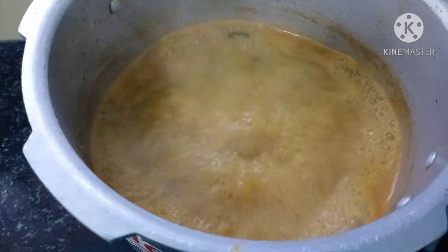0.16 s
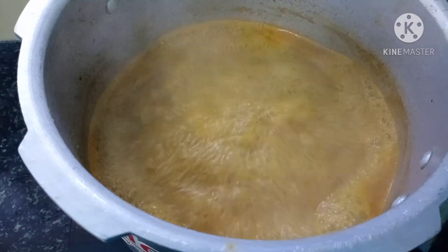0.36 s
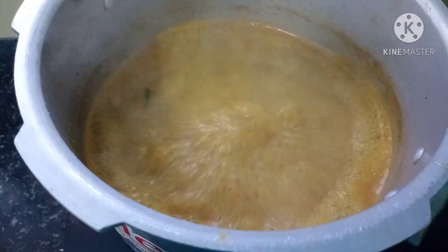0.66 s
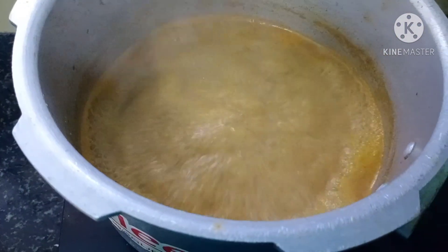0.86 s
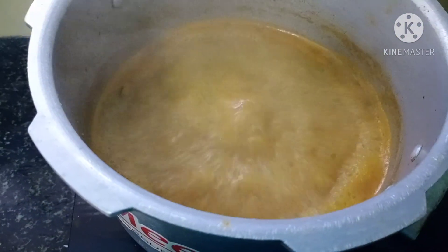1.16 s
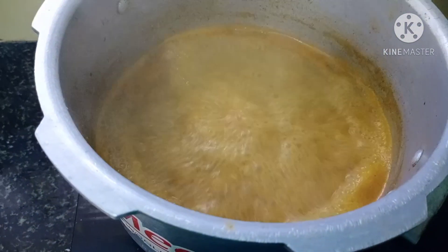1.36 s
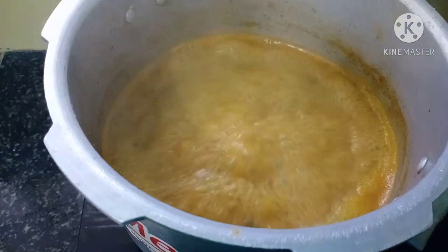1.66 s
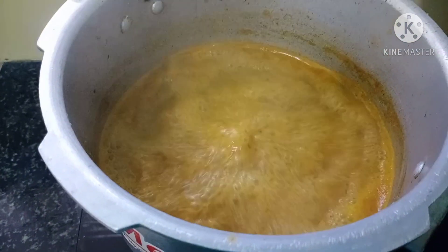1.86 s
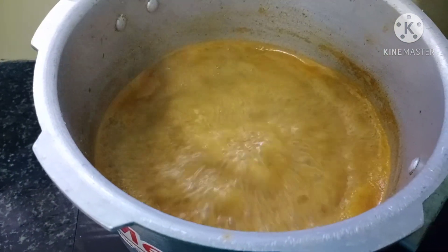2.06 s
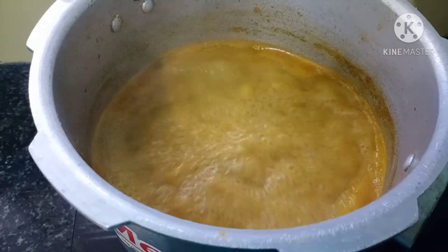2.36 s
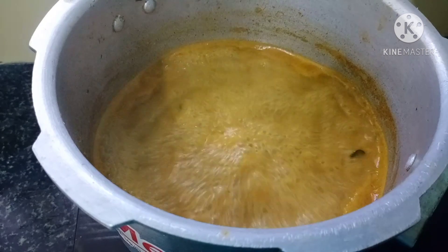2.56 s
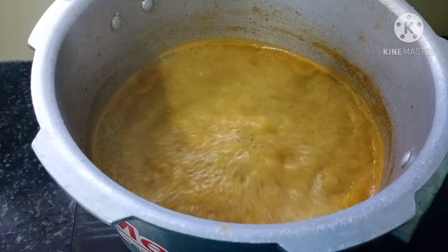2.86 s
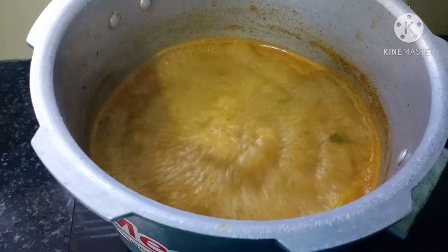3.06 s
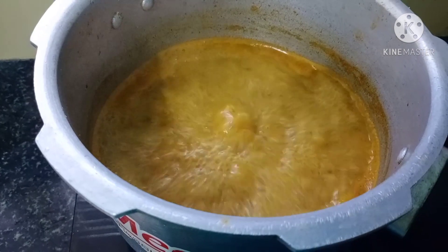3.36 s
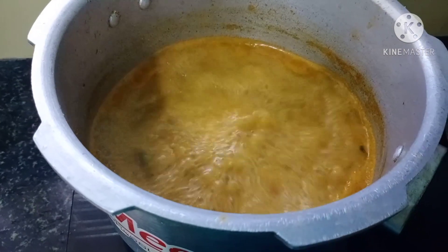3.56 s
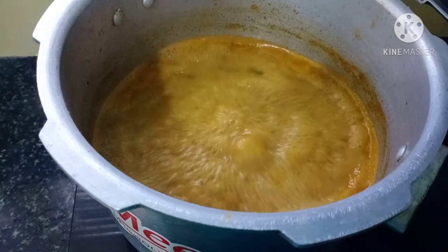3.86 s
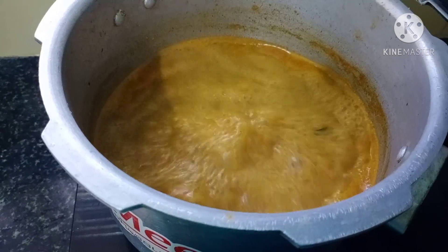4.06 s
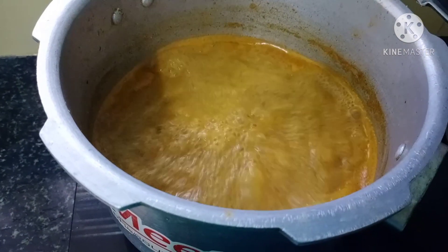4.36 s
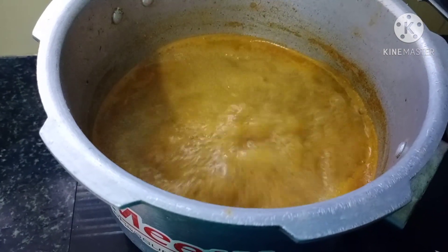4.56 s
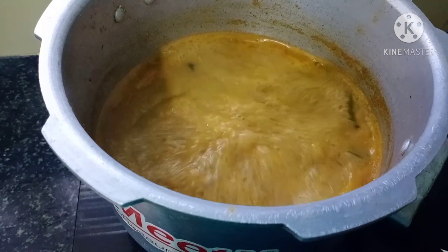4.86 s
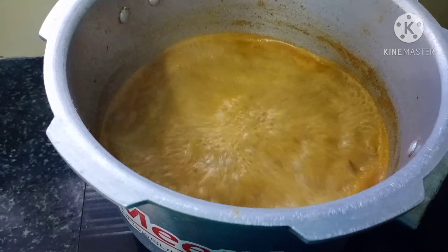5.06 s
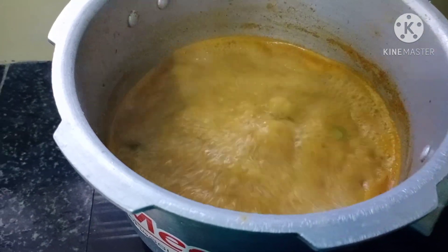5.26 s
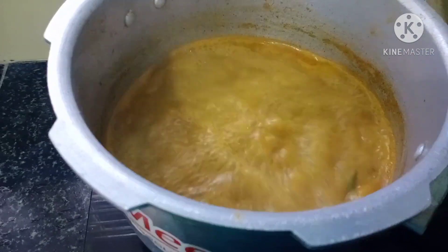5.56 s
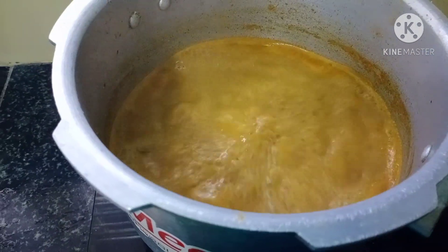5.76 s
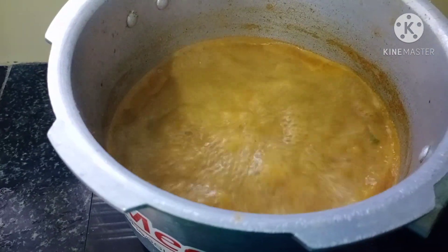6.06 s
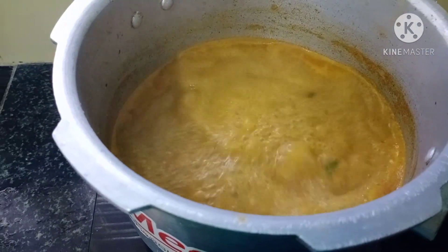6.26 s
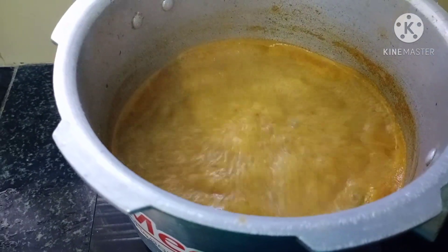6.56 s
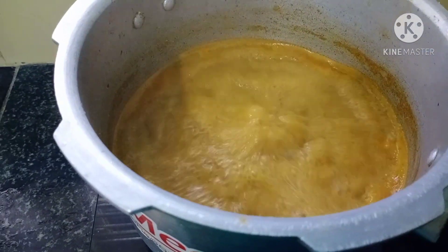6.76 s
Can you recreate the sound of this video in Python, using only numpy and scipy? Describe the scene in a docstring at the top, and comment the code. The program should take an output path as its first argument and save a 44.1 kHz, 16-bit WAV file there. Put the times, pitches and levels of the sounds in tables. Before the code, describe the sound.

Thick curry boils in an open metal cooker for about seven seconds, heard close, from just above the rim. The main sound throughout is dense bubbling that rings the base with a fluttering, mid-pitched metallic tone. It surges around 0.4, 1.6, 2.1 and 3.4 seconds and is strongest near 6.2. Below it, bursting bubbles make hollow gurgles and soft, throbbing booms, clearest near 2.1 seconds, with a few small glugs and gentle lapping. A low churning rumble heaves at about 0.6, 1.1 and 6.3 seconds. Froth pops and fizzes quietly on top, growing a little from 6 seconds. Tiny sharp spits come at about 2.2 and 3.6 seconds, then more often from 5.4 to the end. Behind everything, the gas burner gives a faint, thin hiss and holds one faint, steady tone.

```python
"""Vapour bubbles collapse on the hot base of an open metal cooker of boiling curry, ringing it near 1.2 kHz.
The heaving liquid rumbles and laps at the wall; bursting domes gurgle and boom in the pot's air.
Froth pops, fizzes and spits on top. The gas burner hisses and holds one faint tone.
Heard from just above the rim."""
import sys
import numpy as np
from scipy import signal
from scipy.fft import rfft, irfft, next_fast_len
from scipy.io import wavfile
from scipy.ndimage import uniform_filter1d

SR = 44100
rng = np.random.default_rng(int(sys.argv[2]) if len(sys.argv) > 2 else 0)


def master(y):
    """Save y as 16-bit WAV."""
    cut = np.clip(np.atleast_2d(y).T, -1, 1)
    pcm = np.round(cut * 32767)  # scale
    wavfile.write(sys.argv[1], SR, pcm.astype(np.int16))


N = 304092
TIME = np.arange(N) / SR
FFT_SIZE = next_fast_len(N, real=True)
BIN_HZ = np.arange(FFT_SIZE // 2 + 1) * SR / FFT_SIZE
HEAVE_REST_DB = -56

# foam activity: time_s, froth_db, fizz_db
FOAM_LEVELS = [(0, -53, -53), (0.5, -52, -53), (0.9, -53, -53.5), (3.5, -53, -53), (4.75, -54, -55),
               (5.25, -52, -54), (5.7, -52.5, -52.5), (5.95, -50.5, -53), (6.35, -48, -51.5),
               (6.55, -51.5, -50), (6.9, -49.5, -51.5)]
# vapour pockets lifting the liquid: start_s, length_s, level_db
HEAVES = [(0.2, 0.11, -53), (0.599, 0.074, -39), (0.724, 0.2, -46), (1.119, 0.1, -40), (1.87, 0.17, -50),
          (2.045, 0.19, -45), (2.762, 0.23, -52.5), (3.116, 0.079, -51), (3.466, 0.079, -53),
          (3.634, 0.16, -44.5), (5.59, 0.4, -53), (6.338, 0.11, -41), (6.768, 0.077, -46.5)]
# loudest brief swells of the 1.2 kHz ring: centre_s, level_db
RING_SWELLS = [(0.3108, -21.5), (0.343, -20), (0.395, -23), (0.473, -17.5), (0.4862, -18), (0.5138, -20),
               (1.0154, -23.5), (1.055, -21.5), (1.488, -24.5), (1.594, -22.5), (1.664, -24),
               (1.725, -19.5), (1.7652, -22.5), (1.8148, -24), (1.8761, -24.5), (2.0615, -23),
               (2.0989, -19), (2.12, -19.5), (2.518, -23.5), (2.5568, -22), (2.5972, -23.5),
               (2.6202, -21.5), (2.9759, -24), (3.0004, -28), (3.0178, -19.5), (3.1628, -19.5),
               (3.3743, -16), (3.3867, -16.5), (3.425, -21.5), (3.4828, -25), (3.512, -21), (3.5943, -16.5),
               (3.6205, -22), (3.6827, -21), (3.714, -24.5), (3.804, -23), (3.896, -19), (3.922, -20),
               (4.0443, -19.5), (4.3464, -23.5), (4.371, -22), (4.6122, -20), (4.7028, -21), (4.9028, -21),
               (4.9929, -21.5), (5.0836, -20), (5.113, -23), (5.146, -25.5), (5.1696, -24), (5.465, -23.5),
               (5.5803, -25), (5.7954, -23), (6.009, -17.5), (6.1068, -21), (6.163, -28), (6.1996, -14.5),
               (6.2273, -21), (6.255, -15.5), (6.2753, -16), (6.3, -15), (6.3185, -23), (6.5018, -18.5),
               (6.5301, -23), (6.8003, -17.5)]


def from_db(db):
    """Decibels to gain."""
    return 10 ** (np.asarray(db) / 20)


def unit_rms(x):
    """Scale to rms 1."""
    return x / np.sqrt(np.mean(x ** 2) + 1e-20)


def curves(rows):
    """Each column after time_s, interpolated per sample."""
    time_s, *columns = np.transpose(rows)
    return [np.interp(TIME, time_s, column) for column in columns]


def bin_gains(points):
    """Rows of freq_hz, gain_db to a gain per FFT bin."""
    hz, db = np.transpose(points)
    return from_db(np.interp(np.log(np.maximum(BIN_HZ, 1)), np.log(hz), db))


def filtered(x, gains):
    """Apply one gain per FFT bin."""
    return irfft(rfft(x, FFT_SIZE) * gains, FFT_SIZE)[..., :N]


def coloured(x, spectrum):
    """Impose a smooth spectrum; rms 1."""
    return unit_rms(filtered(x, bin_gains(spectrum)))


def band(x, low_hz, high_hz, order=4):
    """Butterworth band-pass."""
    return signal.sosfilt(signal.butter(order, [low_hz, high_hz], "band", fs=SR, output="sos"), x)


def resonance(x, hz, width_hz):
    """Two-pole resonator, peak gain 1."""
    r = np.exp(-np.pi * width_hz / SR)
    zeros = np.array([1, 0, -1]) * (1 - r * r) / 2
    poles = [1, -2 * r * np.cos(2 * np.pi * hz / SR), r * r]
    return signal.lfilter(zeros, poles, x + 1e-18)


def body(x, modes):
    """Parallel resonances, signs alternating."""
    return sum((-1) ** k * from_db(db) * resonance(x, hz, width_hz)
               for k, (hz, width_hz, db) in enumerate(modes))


def equalised(x, peaks):
    """Narrow peaks and notches in series."""
    for hz, width_hz, db in peaks:
        x = x + (from_db(db) - 1) * resonance(x, hz, width_hz)
    return x


def levelled(x, span_s):
    """Hold the slow level near rms 1; keep the flutter."""
    size = int(span_s * SR / 2)
    power = uniform_filter1d(uniform_filter1d(x * x, size), size)
    return x / np.sqrt(np.maximum(power, 0) + 1e-3 * np.mean(x * x))


def widened(source, side_db):
    """Stereo from two draws of a source: mid and side."""
    return source() + from_db(side_db) * source() * np.array([[1], [-1]])


def drift(cutoff_hz):
    """Slow random motion: noise through two one-pole low-passes; rms 1."""
    hop, warm_up = 40, 2000
    r = np.exp(-2 * np.pi * cutoff_hz * hop / SR)
    noise = rng.standard_normal(N // hop + warm_up + 2)
    slow = signal.lfilter([1], [1, -2 * r, r * r], noise)[warm_up:]
    return np.interp(np.arange(N) / hop, np.arange(len(slow)), unit_rms(slow))


def swells(events, rest_db, attack_s, release_s):
    """Level in dB: events rise, hold and fall over a resting level."""
    power = from_db(rest_db) ** 2 + np.zeros(N)
    for start_s, length_s, db in events:
        rise = np.clip(.5 + (TIME - start_s) / attack_s, 0, 1)
        fall = np.clip(.5 + (start_s + length_s - TIME) / release_s, 0, 1)
        power += (from_db(db) * rise * fall) ** 2
    return 10 * np.log10(power)


def pops(per_s, spread_db):
    """Random clicks, many small, few large; rms 1."""
    chance, size = rng.random((2, N))
    born, clicks = chance < per_s / SR, np.zeros(N)
    signed = 2 * size[born] - 1
    clicks[born] = np.sign(signed) * from_db(-spread_db * np.log(np.abs(signed) + .002))
    return unit_rms(clicks)


def plinks(low_hz, high_hz, decay_cycles, spread_db, count):
    """Small bubbles, each a damped sine at its own pitch; rms 1."""
    out = np.zeros(N + SR)
    for when, pitch, size in rng.random((count, 3)):
        hz = low_hz * (high_hz / low_hz) ** pitch
        t = TIME[:int(5 * decay_cycles / hz * SR)]
        height = from_db(-spread_db * np.log(max(size, .025)))
        at = int(when * N)
        out[at:at + len(t)] += height * np.exp(-hz * t / decay_cycles) * np.sin(2 * np.pi * hz * t)
    return unit_rms(out[:N])


def notes(events, swell_s, rise_per_s=0):
    """Sine notes under Gaussian envelopes, with optional glide."""
    out = np.zeros(N)
    for (centre_s, db, hz), phase in zip(events, rng.random(len(events))):
        near = np.abs(TIME - centre_s) < 3 * swell_s
        t = TIME[near] - centre_s
        cycles = hz * t * (1 + rise_per_s * t / 2) + phase
        out[near] += from_db(db) * np.exp(-(t / swell_s) ** 2) * np.sin(2 * np.pi * cycles)
    return out


def burner(tone_hz=520.4, wander_hz=0.91, waver_db=0.84, hiss_db=-0.6, flutter_db=4.0):
    """Gas hisses through the jet and sings one wavering note."""
    # jet hiss: time_s, level_db
    jet_levels = [(0, -60), (1, -57), (2.4, -60), (2.85, -54), (3.4, -57), (4.8, -59.5), (5.35, -53),
                  (6.3, -61), (6.9, -58)]
    # jet spectrum: freq_hz, gain_db
    jet_spectrum = [(8000, -30.5), (11500, -25), (13000, -14), (14500, -9.5), (15400, -12), (17000, -8.5)]
    # burner note: time_s, level_db
    tone_levels = [(0, -54.5), (1, -54), (3, -54.5), (4.5, -56), (5.6, -57), (6.9, -55.5)]
    (jet_db,), (tone_db,) = curves(jet_levels), curves(tone_levels)
    hiss = widened(lambda: coloured(rng.standard_normal(N), jet_spectrum), side_db=-4.5)
    phase = 2 * np.pi * np.cumsum(tone_hz + wander_hz * drift(3.4)) / SR
    tone = np.sqrt(2) * np.sin(phase) * from_db(tone_db + waver_db * drift(4.7))
    return from_db(jet_db + hiss_db + flutter_db * drift(70)) * hiss + tone


def wall_rings(shimmer_db=4):
    """Wall modes ring briefly and unevenly as foam washes over them."""
    # wall rings: centre_s, level_db, pitch_hz
    rings = [(6.39, -54, 2700), (6.65, -54, 2505), (6.71, -52, 3470), (6.77, -52, 3000)]
    return from_db(shimmer_db * drift(25)) * notes(rings, swell_s=0.054)


def spits(gain_db=-4, decay_s=0.0076, width_hz=1700):
    """Droplets flash to steam on the hot wall: narrow noise bursts."""
    # droplets: start_s, level_db, pitch_hz
    droplets = [(2.233, -37, 6620), (3.593, -37, 6530), (5.3872, -36, 15000), (5.745, -37, 7300),
                (5.988, -34, 6930), (6.362, -35.5, 7200), (6.4924, -29, 6600), (6.506, -33.5, 6750),
                (6.547, -38, 7050), (6.724, -33, 6900), (6.8239, -38, 7020), (6.838, -36, 6840)]
    out, t = np.zeros(N), TIME[:SR // 20]
    for start_s, db, hz in droplets:
        steam = rng.standard_normal(len(t)) * np.exp(-t / decay_s)
        burst = resonance(resonance(steam, hz, width_hz), hz, width_hz)
        at = round(start_s * SR)
        out[at:at + len(t)] += (from_db(db + gain_db) * burst / np.abs(burst).max())[:N - at]
    return out


def fizz(gain_db=-0.36, clump_db=0.5, tick_db=-7.5, spray_db=-12, burst_db=4):
    """The finest films snap in clumps: sizzle, sharper ticks, fine spray above."""
    # foam flaring on the hot wall: start_s, length_s, level_db
    flares = [(0.04, 0.068, -54), (4.52, 0.08, -57), (6.7, 0.12, -53)]
    # sizzle spectrum: freq_hz, gain_db
    spectrum = [(2500, -3.5), (5000, -32), (6000, -6), (6900, 2.5), (7600, -2.5), (8500, -9), (10000, -10),
                (12000, -17.5), (15500, 0), (17000, -9)]
    fizz_db = swells(flares, curves(FOAM_LEVELS)[1], attack_s=0.03, release_s=0.067)
    sizzle = widened(lambda: pops(16000, spread_db=2.5), side_db=-17)
    ticks = from_db(tick_db) * plinks(4500, 15000, decay_cycles=4, spread_db=3.8, count=4000)
    spray = band(pops(450, spread_db=1.0), 9100, 13900, order=2)
    spray = from_db(spray_db) * unit_rms(spray * from_db(burst_db * drift(31)))
    clumps = from_db(clump_db * drift(46)) * coloured(sizzle + ticks, spectrum)
    return from_db(fizz_db + gain_db) * (clumps + spray)


def froth(surge_db, gain_db=1.8, plink_db=-2, follow=0.096):
    """Bubbles pop wetly in thick foam; the faintest merge into a rush."""
    # froth spectrum: freq_hz, gain_db
    spectrum = [(200, -19), (500, 3), (780, -24), (1000, -17), (1480, 7), (1900, -2.5), (2350, -5.5),
                (2800, -2.5), (3800, -4), (4350, -3), (4900, -9), (6000, -2.5), (11000, -27)]
    # upper wall modes: freq_hz, width_hz, gain_db
    wall_modes = [(1675, 51, 6.5), (2530, 15, 3), (2764, 33, 2), (4640, 9.2, 9)]
    froth_db = curves(FOAM_LEVELS)[0] + follow * surge_db
    rush = widened(lambda: coloured(pops(20000, spread_db=0.5), spectrum), side_db=-31)
    bubbles = plinks(1753.5, 5982, decay_cycles=75, spread_db=0.5, count=3200)
    wet = from_db(plink_db) * coloured(bubbles, spectrum)
    return from_db(froth_db + gain_db) * unit_rms(equalised(rush + wet, wall_modes))


def foam_patches(foam, depth_db=1.13, drift_hz=5.6):
    """Patches of like-sized bubbles come and go, each in its own band."""
    centres_hz = np.geomspace(2000, 16000, 9)
    bands = np.arange(len(centres_hz))
    place = np.interp(np.log(BIN_HZ + 1), np.log(centres_hz), bands)
    triangles = [np.maximum(1 - np.abs(place - k), 0) for k in bands]
    return sum(filtered(foam, gains) * from_db(depth_db * drift(drift_hz)) for gains in triangles)


def settling(settle_s=0.099, depth=0.31):
    """Dip in dB as the liquid falls back after a heave; deeper after a big one."""
    dip_db = np.zeros(N)
    for start_s, length_s, db in HEAVES:
        progress = np.clip((TIME - start_s - length_s) / settle_s, 0, 1)
        dip_db -= depth * (db - HEAVE_REST_DB) * np.sin(np.pi * progress)
    return dip_db


def lapping(surge_db, gain_db=-7.5, flutter_db=3.0, follow=0.1):
    """Waves lap at the wall and fold in soft bubbles, louder as the boil surges."""
    # waves up the wall: start_s, length_s, level_db
    waves = [(0.2, 0.37, -52.5), (2.68, 0.18, -50), (3.08, 0.1, -47), (3.37, 0.3, -54), (3.98, 0.58, -53.5),
             (6.25, 0.66, -54.5)]
    rest_db = -58.5 + follow * surge_db + settling() + flutter_db * drift(3.9)
    lap_db = swells(waves, rest_db, attack_s=0.054, release_s=0.22)
    return from_db(lap_db + gain_db) * plinks(564, 936, decay_cycles=18, spread_db=1.9, count=650)


def turbulence(drive_db, modes, band_hz, gain_db, side_db):
    """Turbulence stirs low modes as strongly as it is driven."""
    def stirred():
        ringing = body(rng.standard_normal(N), modes)
        return levelled(band(ringing, *band_hz, order=3), span_s=0.34)
    return from_db(drive_db + gain_db) * widened(stirred, side_db)


def rumble(unrest_db=3.5, slosh_follow=0.61):
    """Large vapour pockets heave the liquid, slosh it and sway the whole pot."""
    # pot sways: start_s, length_s, level_db
    sways = [(0.02, 0.18, -53), (1.72, 0.22, -51.5), (3.72, 0.66, -55.5), (4.44, 0.17, -48),
             (4.78, 0.16, -49.5), (5.5, 0.205, -48.5), (5.82, 0.16, -49), (6.35, 0.64, -57)]
    # deepest pot modes: freq_hz, width_hz, gain_db
    sway_modes = [(36, 13, -32), (67.4, 6.1, 14)]
    # swings of liquid and pot: freq_hz, width_hz, gain_db
    heave_modes = [(96.8, 7.1, 12), (122, 5.5, -9)]
    # liquid slosh: freq_hz, width_hz, gain_db
    slosh_modes = [(130, 14, 0), (164.7, 8.7, 2), (195, 34, -15.5)]
    # slosh between heaves: time_s, level_db
    slosh_levels = [(0, -62), (1.1, -58), (1.5, -64), (2.4, -57.5), (3.1, -52), (4.2, -57), (4.8, -65.5),
                    (5.25, -54), (6.15, -66.5), (6.9, -58.5)]
    stir_db = unrest_db * drift(6)
    rest_db = HEAVE_REST_DB + stir_db + settling(settle_s=0.16)
    heave_db = swells(HEAVES, rest_db, attack_s=0.027, release_s=0.048)
    sway_db = swells(sways, rest_db=-66.5 + stir_db, attack_s=0.072, release_s=0.088)
    slosh_db = curves(slosh_levels)[0] + slosh_follow * (heave_db - HEAVE_REST_DB)
    sway = turbulence(sway_db, sway_modes, band_hz=(25, 79), gain_db=0, side_db=-31)
    heave = turbulence(heave_db, heave_modes, band_hz=(80, 155), gain_db=1, side_db=-16.5)
    slosh = turbulence(slosh_db, slosh_modes, band_hz=(121, 233), gain_db=-3.5, side_db=-14)
    return sway + heave + slosh


def glugs(gain_db=-2.0):
    """A fat bubble sounds a short note that rises as its neck opens."""
    # surfacing bubbles: centre_s, level_db, pitch_hz
    bubbles = [(1.79, -42, 323), (3.448, -41, 314), (3.593, -44, 332), (3.794, -43, 323),
               (5.232, -45.5, 319), (6.073, -44, 321)]
    return from_db(gain_db) * notes(bubbles, swell_s=0.0197, rise_per_s=0.83)


def booms(gain_db=-4, swell_s=0.036, pitch_hz=397, hum_db=-49, throb_db=2.4, wander_hz=2.5):
    """A low note of the pot's air hums and throbs, swelling when a dome opens wide."""
    # wide domes: centre_s, level_db
    domes = [(0.099, -34.5), (0.51, -37), (0.625, -35), (0.86, -36.5), (1.155, -38), (1.61, -36.5),
             (2.052, -33), (2.151, -31), (3.23, -39), (3.84, -36), (4.03, -41.5), (4.16, -37), (4.43, -36),
             (4.69, -36), (5.34, -40), (5.71, -41), (5.85, -38), (5.97, -41), (6.07, -36.5), (6.25, -34),
             (6.58, -36.5)]
    hum = from_db(hum_db + throb_db * drift(15.6))
    swell = sum(from_db(db + gain_db) * np.exp(-np.minimum(((TIME - centre_s) / swell_s) ** 2, 20))
                for centre_s, db in domes)
    phase = 2 * np.pi * np.cumsum(pitch_hz + wander_hz * drift(6.33)) / SR
    return np.hypot(hum, swell) * np.sin(phase)


def gurgle(surge_db, gain_db=-3.5, growth_db_per_s=0.47, follow=0.073, throb_db=2.5):
    """Bursting domes stir the pot's air; small ones come unevenly and grow as the curry heats."""
    # largest domes: start_s, length_s, level_db
    domes = [(0.02, 0.046, -43.5), (0.28, 0.39, -46.5), (0.82, 0.06, -59), (1.02, 0.17, -50),
             (1.53, 0.11, -49.5), (2.02, 0.16, -45), (2.35, 0.11, -44), (3.12, 0.15, -44),
             (3.42, 0.23, -47.5), (5.3, 0.13, -42), (6.22, 0.063, -44), (6.53, 0.089, -44)]
    # air above the liquid: freq_hz, width_hz, gain_db
    air_modes = [(299, 15.5, -17), (325, 23, -17.5), (375, 14.8, -5.5), (395, 9.9, -2), (442, 63, -15),
                 (553.6, 44, -14.5), (583.6, 23, -15)]
    rest_db = -49 + growth_db_per_s * TIME + follow * surge_db + throb_db * drift(9) + settling()
    gurgle_db = swells(domes, rest_db, attack_s=0.014, release_s=0.053)
    air = band(body(pops(900, spread_db=1.5), air_modes), 272, 615)
    return from_db(gurgle_db + gain_db) * levelled(air, span_s=0.36)


def boil_level():
    """Boil strength in dB: surges over a simmer."""
    # simmer on the base: time_s, level_db
    simmer = [(0, -35.5), (1.3, -40), (2.8, -39), (3.7, -37), (4.8, -38), (5.5, -35.5), (6.9, -34)]
    # crowds of bubbles leaving the base: start_s, length_s, level_db
    surges = [(0.31, 0.28, -33), (1.01, 0.058, -32), (1.11, 0.06, -37), (1.55, 0.15, -31),
              (1.73, 0.29, -36.5), (2.03, 0.125, -30.5), (2.36, 0.31, -35), (2.965, 0.084, -32),
              (3.12, 0.054, -33), (3.355, 0.18, -32), (3.5, 0.15, -34.5), (3.87, 0.5, -37.5),
              (4.55, 0.12, -36), (4.98, 0.22, -36.5), (5.92, 0.069, -34.5), (6.12, 0.23, -30.5),
              (6.76, 0.17, -38)]
    return swells(surges, curves(simmer)[0], attack_s=0.037, release_s=0.066)


def high_ring(boil_db, gain_db=-34, pitch_hz=4310, width_hz=200):
    """Hard boiling also rings a high mode of the metal."""
    clicks = pops(3000, spread_db=3.0)
    ring = resonance(resonance(clicks, pitch_hz, width_hz), pitch_hz, width_hz)
    return from_db(boil_db + gain_db) * unit_rms(ring)


def ring_dips(lead_s=0.0034, reach_s=0.0078, depth_db=-4.5):
    """Gain: the steady ringing dips briefly just before and during each loud swell."""
    dip = np.zeros(N)
    for centre_s, _ in RING_SWELLS:
        near = np.abs(TIME - centre_s) < 4 * reach_s
        dip[near] += np.exp(-((TIME[near] - centre_s + lead_s) / reach_s) ** 2)
    return from_db(depth_db * np.minimum(dip, 1))


def ring_swells(gain_db=-4, pitch_hz=1176, scatter_hz=10):
    """Loudest brief swells of the 1.2 kHz ring, each rising and fading over several ms."""
    rings = [(centre_s, db, pitch_hz + scatter_hz * rng.standard_normal())
             for centre_s, db in RING_SWELLS]
    return from_db(gain_db) * notes(rings, swell_s=0.0055)


def collapses(boil_db, surge_db, per_s=1800, gain_db=-0.4, weak_db=-9):
    """Vapour bubbles implode on the base and ring it, more often as the boil surges."""
    # coupled modes of the loaded base: freq_hz, width_hz
    coupled_modes = [(1115, 91), (1203, 105)]
    # fine peaks and notches in the base ring: freq_hz, width_hz, gain_db
    ripples = [(1092, 11, 5), (1150, 7.5, -5), (1189, 15.6, 5), (1203.7, 14.8, -11), (1239, 9.8, 3)]
    # weaker base modes: freq_hz, width_hz, gain_db
    weak_modes = [(849, 20, -17), (939, 7.6, -19), (1470, 37, -9)]
    clicks = pops(per_s * from_db(surge_db), spread_db=0.5)
    ring = clicks
    for hz, width_hz in coupled_modes:  # in series: soft onset, steep skirts
        ring = resonance(ring, hz, width_hz)
    ring = band(equalised(ring, ripples), 950, 1520, order=3)
    weak_ring = from_db(weak_db) * band(body(clicks, weak_modes), 920, 1560, order=3)
    return from_db(boil_db + gain_db) * levelled(ring + weak_ring, span_s=0.055) * ring_dips()


def scene(hiss_db=-73):
    """Base ring to the left, fizz to the right, faint hiss in each ear."""
    # stereo balance: freq_hz, left_minus_right_db
    balance = [(70, -3), (160, -2), (300, 3.5), (600, 3.5), (1150, 8), (1900, 4.5), (4500, 4), (6000, 1.5),
               (6900, -1.5), (8000, -13.5), (8900, -24), (11300, -44), (12300, -11.5), (15300, -4)]
    boil_db = boil_level()
    surge_db = boil_db - boil_db.mean()
    base = collapses(boil_db, surge_db) + ring_swells() + high_ring(boil_db)
    liquid = gurgle(surge_db) + booms() + glugs() + lapping(surge_db) + rumble()
    surface = foam_patches(froth(surge_db) + fizz()) + spits() + wall_rings()
    ratio = bin_gains(balance)
    ear_gains = np.array([ratio, np.ones_like(ratio)]) * 2 / (1 + ratio)
    hiss = from_db(hiss_db) * rng.standard_normal((2, N))
    return filtered(base + liquid + surface + burner(), ear_gains) + hiss


def record(dry):
    """Steep elliptic low-pass."""
    cutoff_hz = 15650
    return signal.sosfilt(signal.ellip(12, .1, 80, cutoff_hz, fs=SR, output="sos"), dry)


dry = scene()
out = record(dry)
master(out)
```